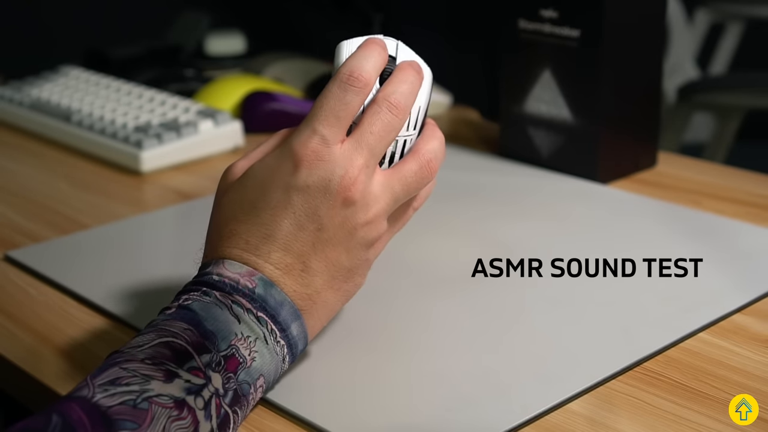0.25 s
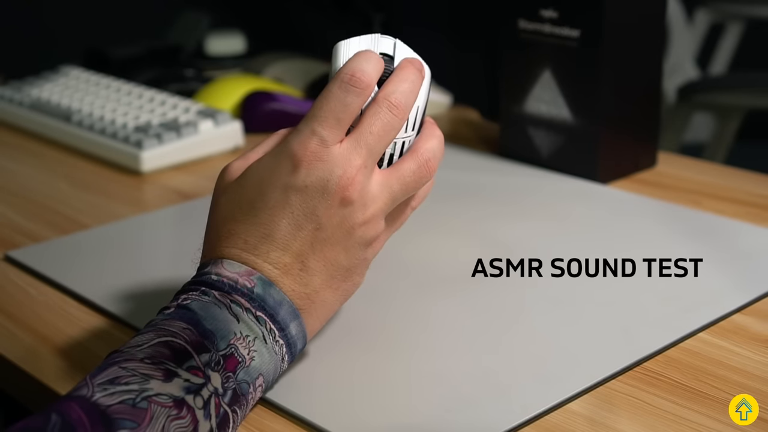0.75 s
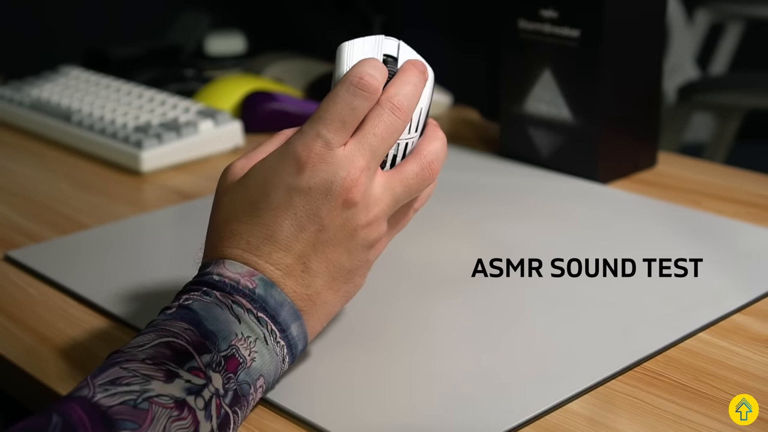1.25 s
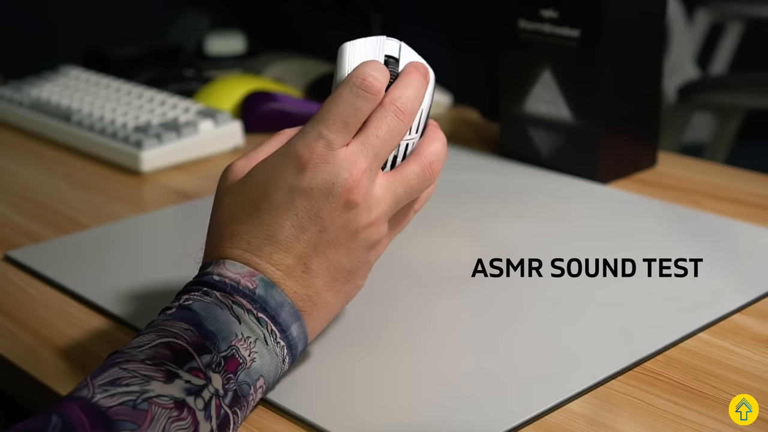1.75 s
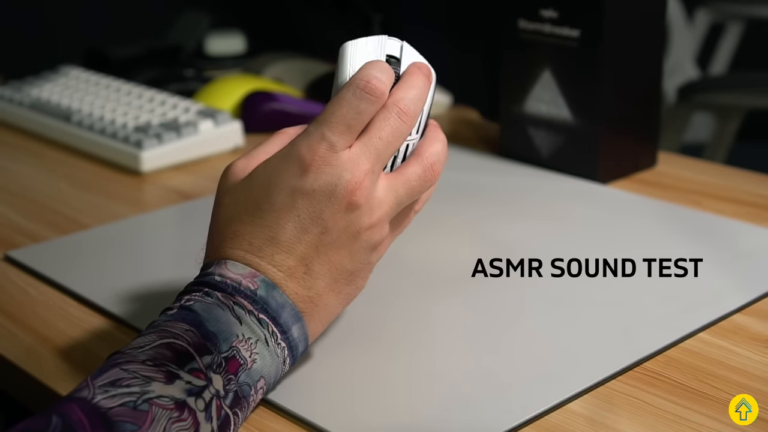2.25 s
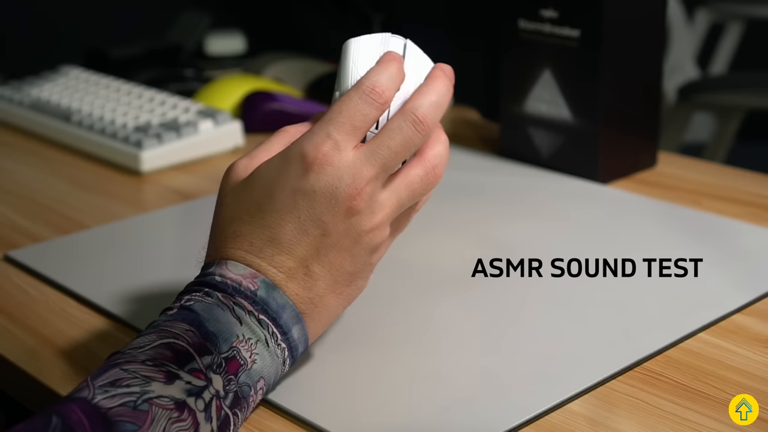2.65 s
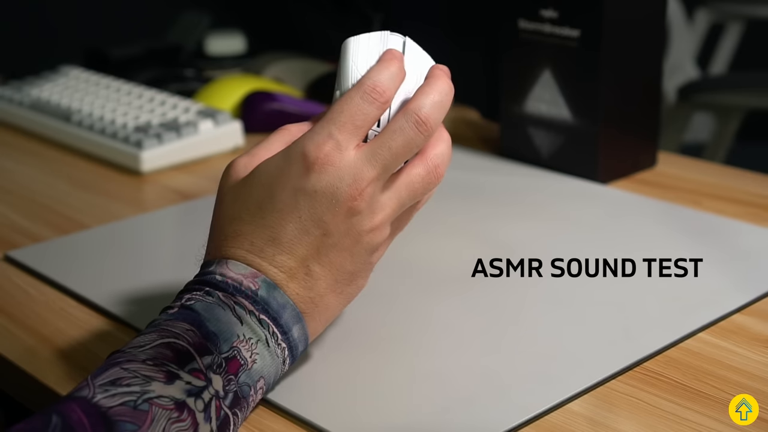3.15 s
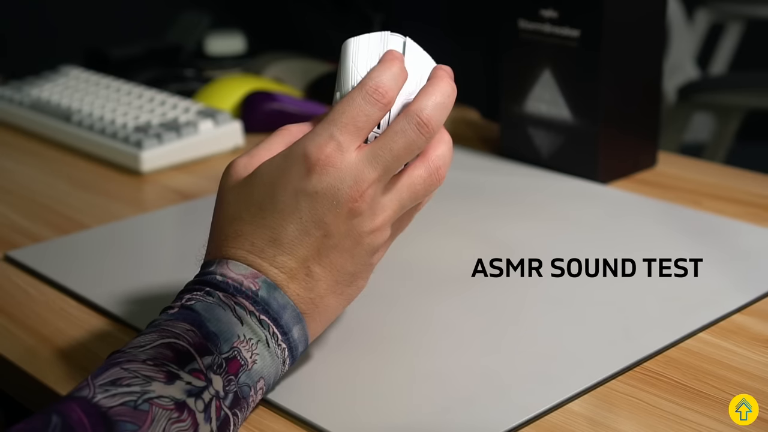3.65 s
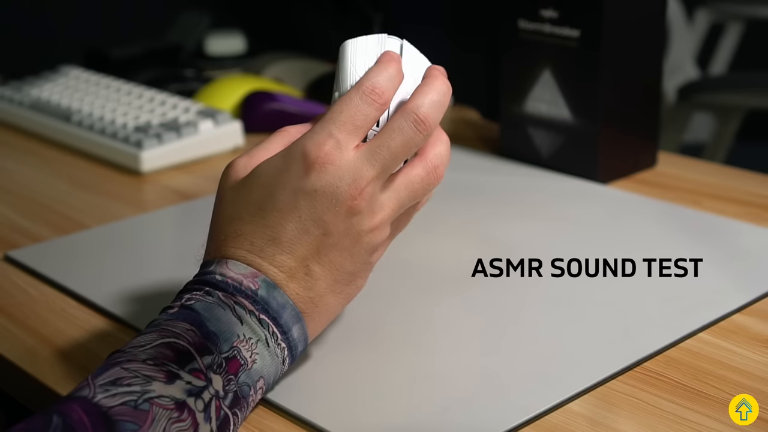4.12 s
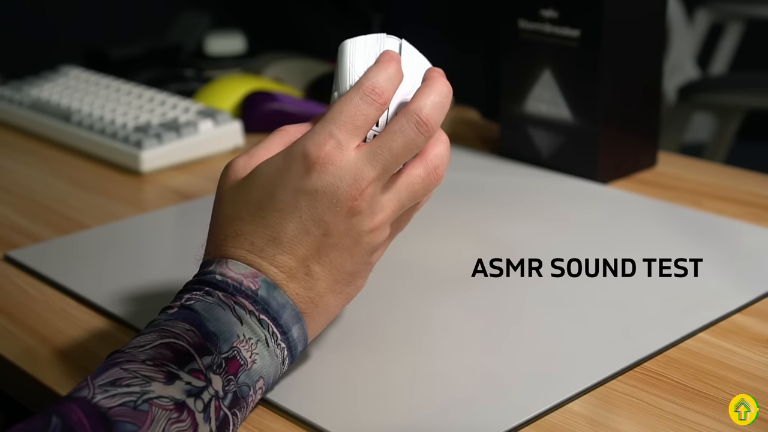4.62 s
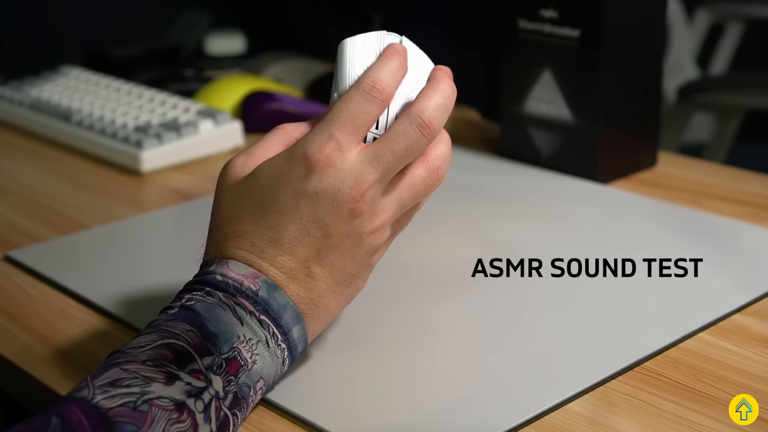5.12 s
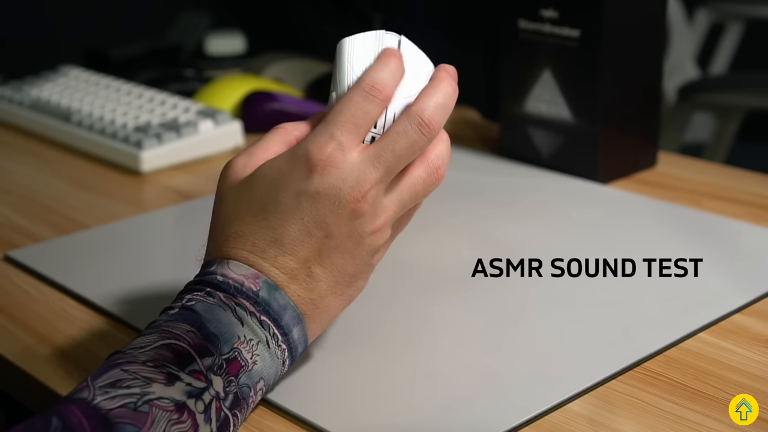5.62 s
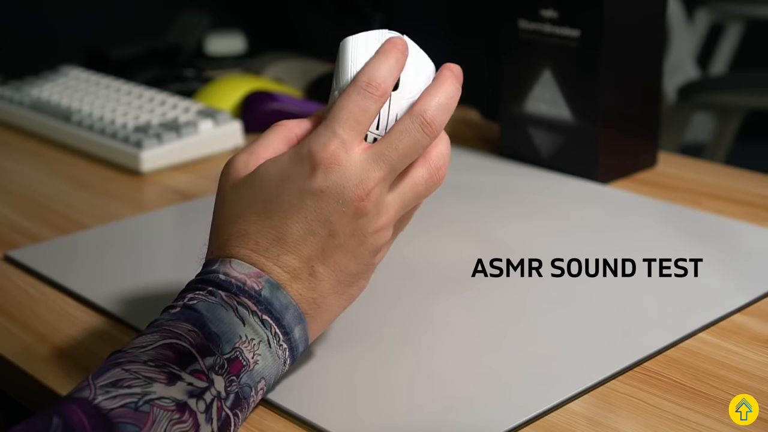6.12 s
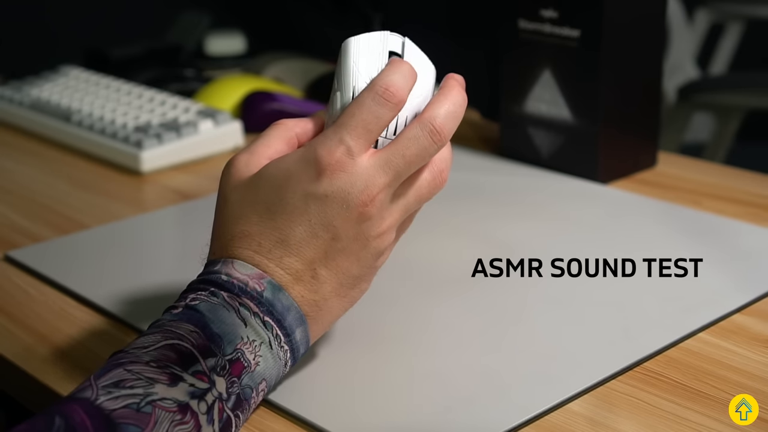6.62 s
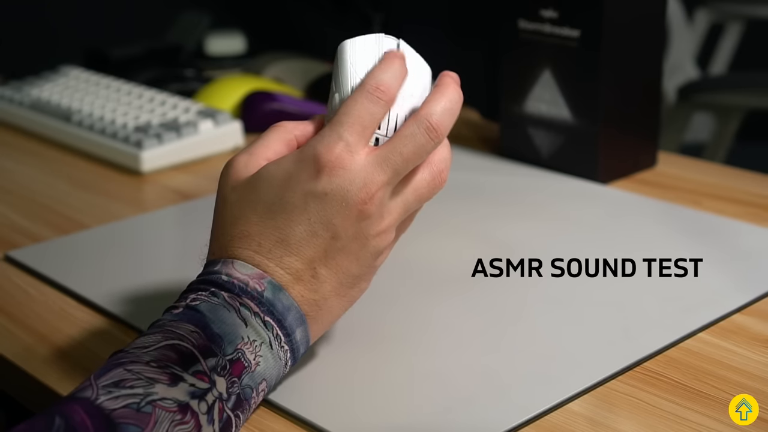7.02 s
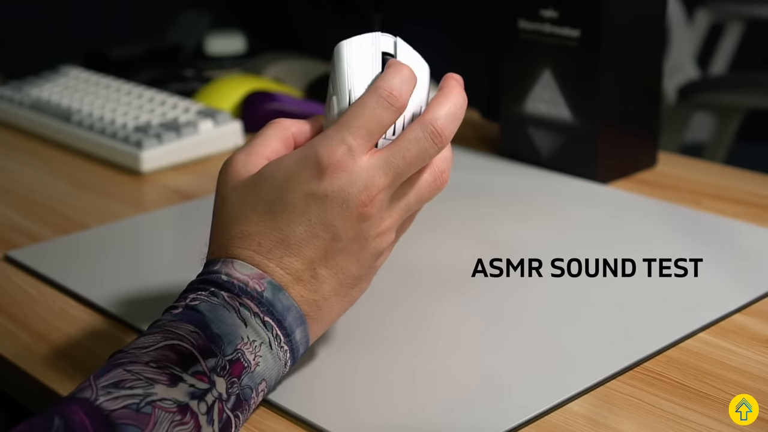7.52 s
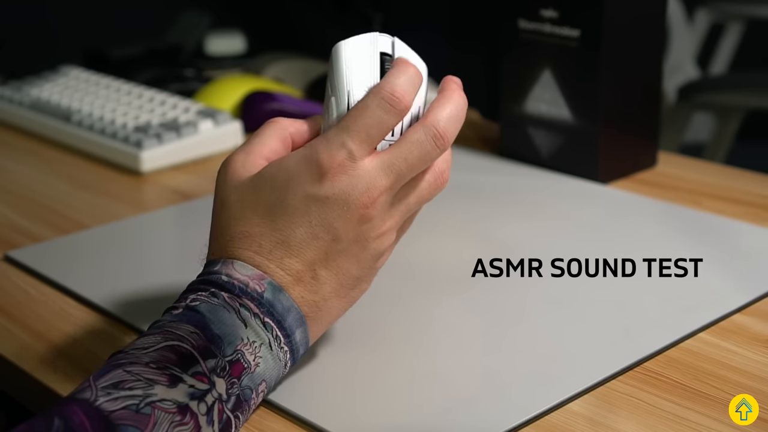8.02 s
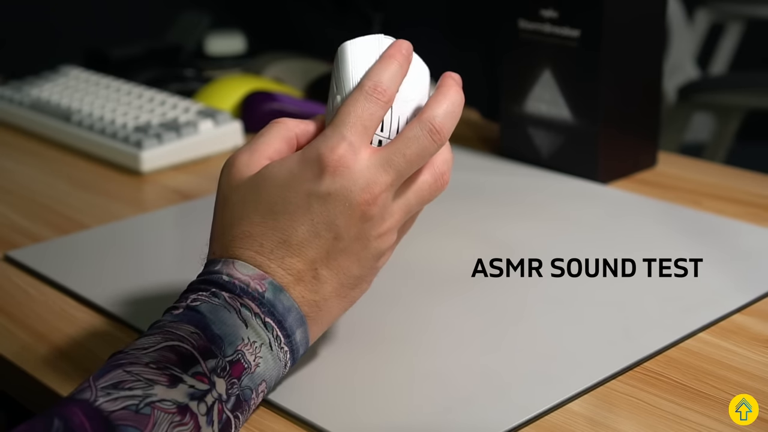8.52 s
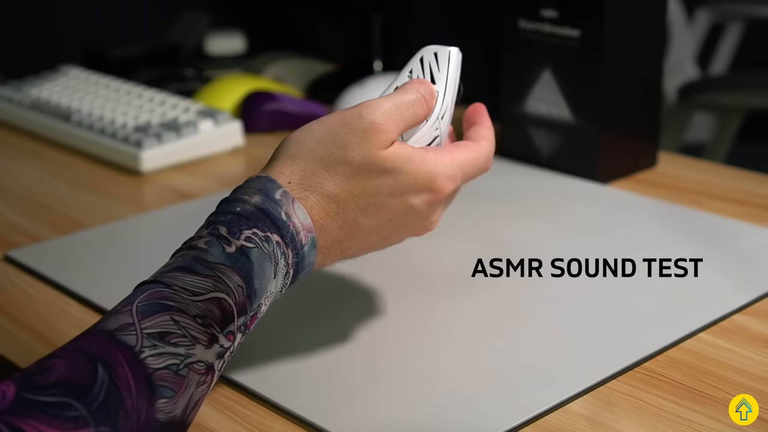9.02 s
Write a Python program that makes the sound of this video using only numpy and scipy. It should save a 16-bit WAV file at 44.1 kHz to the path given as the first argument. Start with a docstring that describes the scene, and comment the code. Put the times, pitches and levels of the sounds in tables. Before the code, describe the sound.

A small quiet room, microphone close to a computer mouse on a desk mat, with soft fan air and faint low hum throughout. From 0 to 2.4 s the main button clicks about four times a second, eleven crisp bright presses, with audible springing back between them; a couple of tiny squeaks hide early on. From 2.7 to 5 s the wheel is pressed seven times, slower and less regular, duller and hollower, with distinct down and up snaps; a low desk bump falls near 3.3 s. From 5.2 to 8.4 s the wheel rolls in twelve short flicks, each a tiny rapid ratchet of about five to eight ticks, quiet and muffled at first, crisper and stronger after 6.9 s. A faint hiss at 8.8 s precedes two sharp, loud, very bright side-button clicks at 8.9 and 9.1 s, each with a strong release. Short diffuse reflections follow the snaps.

```python
"""In a small quiet room, a computer mouse is tried out on a desk mat, close to the microphone. The main buttons
click, the wheel is pressed as a button, then rolled in short flicks; last, the side buttons click. Each snap is
a tiny impact with weak rebounds that rings the plastic parts; noise shaped like a room adds reflections. Under
it, low noise makes the desk sway and rumble, and a fan gives soft air noise and a hum."""
import sys
import numpy as np
from scipy import signal
from scipy.fft import rfft, irfft, next_fast_len
from scipy.io import wavfile
from scipy.ndimage import uniform_filter1d

SR = 44100
rng = np.random.default_rng(int(sys.argv[2]) if len(sys.argv) > 2 else 0)


def digitize_waveform(pressure):
    """Quantize a signal to 16-bit integers and store it at the path in sys.argv[1].

    Rows of a 2-D input are taken as channels; values are limited to [-1, 1].
    """
    field = np.atleast_2d(pressure).T
    bounded = np.clip(field, -1, 1)
    quanta = np.round(bounded * 32767).astype(np.int16)
    wavfile.write(sys.argv[1], SR, quanta)


N = 408366
TIME = np.arange(N) / SR   # s


def from_db(db):
    """Turns decibels into a plain factor."""
    return 10 ** (np.asarray(db) / 20)


def rms_one(x):
    """Scales a sound to an average strength (rms) of 1."""
    return x / np.sqrt(np.mean(x ** 2) + 1e-20)


def at_hz(points, hz, axis=1):
    """Reads one column of a table on a log-frequency axis."""
    table = np.array(points)
    return np.interp(np.log(hz + 1e-9), np.log(table[:, 0]), table[:, axis])


def noise(spectrum):
    """Steady noise of a given colour, with nothing above the table's highest frequency; rms 1."""
    size = next_fast_len(N)
    hz = np.fft.rfftfreq(size, 1 / SR)
    colour = from_db(at_hz(spectrum, hz)) * (hz < spectrum[-1][0])
    white = rng.standard_normal(N)
    return rms_one(irfft(rfft(white, size) * colour, size)[:N])


def resonate(x, hz, width):
    """A part that likes to ring at one pitch: gain 1 at the top, and a narrower width rings longer."""
    r = np.exp(-np.pi * width / SR)
    feed = np.array([1, 0, -1]) * (1 - r * r) / 2
    feedback = [1, -2 * r * np.cos(2 * np.pi * hz / SR), r * r]
    return signal.lfilter(feed, feedback, x)


def ring_together(x, modes):
    """Drives several modes at once with the same sound; every second mode is flipped in sign."""
    return sum((-1) ** k * from_db(db) * resonate(x, hz, width) for k, (hz, width, db) in enumerate(modes))


def disperse(x, transit_ms):
    """Bending waves run to and fro in the shell: allpasses smear a snap without colouring it."""
    for share in (.17, .31, .52):
        gap = np.zeros(max(int(share * transit_ms * SR / 1000), 1))
        x = signal.lfilter(np.r_[.6, gap, 1], np.r_[1, gap, .6], x)
    return x


# The finger never lies twice on the same spot, so every mode shifts a little from snap to snap.
DETUNE = 0.012   # typical shift, share of the pitch
RING_S = .03     # each ring is cut off after this time, before the smearing


def snaps(events, modes, transit_ms, chatter_db, chatter_s, scatter_db, crack_db, count=9):
    """Each snap is one impact and a few weak rebounds: a broad crack, and a short ring of every mode."""
    out, size = np.zeros(N + SR), int(RING_S * SR)
    parts = list(modes) + [(10200, 1800, crack_db)]   # the crack is one more, very wide mode
    for start, strength_db, brightness in events:
        delays = np.r_[0, rng.uniform(0, chatter_s, count - 1)]
        sizes = np.r_[1, rng.standard_normal(count - 1) * from_db(chatter_db)]
        sizes /= np.linalg.norm(sizes)   # the rebounds share the snap's energy
        impacts = np.bincount((delays * SR).astype(int), sizes, size)
        at = int(round(start * SR))
        for k, (hz, width, mode_db) in enumerate(parts):
            octaves = np.log2(hz / 6000)   # brightness tilts the modes around 6 kHz
            scatter = scatter_db * rng.standard_normal()
            height = from_db(strength_db + mode_db + brightness * octaves + scatter)
            pitch = hz * (1 + DETUNE * rng.standard_normal())
            out[at:at + size] += (-1) ** k * height * resonate(impacts, pitch, width)
    return disperse(out[:N] + 1e-18, transit_ms)


def blips(events):
    """Short tones that swell and fade."""
    total = 0
    for middle, hz, db, half in events:
        since = TIME - middle
        swell = np.exp(-(since / half) ** 2 / 2)
        total = total + from_db(db) * swell * np.sin(2 * np.pi * hz * since)
    return total


# Main button going down: (time [s], strength [dB], brightness [dB per octave])
MAIN_PRESSES = [(0.0338, 3, 3), (0.2903, 6, 0.3), (0.5578, 6, 0), (0.8466, 6, 0.4), (1.0669, 7, -0.3),
                (1.3283, 6, 0.2), (1.5714, 6, 0.2), (1.7758, 6, -0.3), (1.9853, 4.5, 0.5),
                (2.2051, 4.5, -0.5), (2.3785, 5, -0.5)]
# Main button springing back: (time [s], strength [dB], brightness [dB per octave])
MAIN_RELEASES = [(0.179, 3.6, 0.077), (0.4258, 5.3, -0.55), (0.723, 3.5, 0.61), (0.956, 5.4, -0.19),
                 (1.1953, 5.1, -0.46), (1.4192, 5.2, -0.23), (1.64, 5.7, 0.035), (1.8682, 5, -0.12),
                 (2.0824, 5, -0.035), (2.2708, 5.3, -0.38)]
# Ringing modes of the main button:
# (frequency [Hz], width [Hz], relative level on press [dB], relative level on release [dB])
BUTTON_MODES = [(693, 167, -26.5, -23.5), (1735, 296, -23, -27.5), (2785, 250, -24, -24.5),
                (3540, 390, -29, -22), (4670, 340, -8, -13), (5700, 243, -17, -14), (6840, 370, -8.5, -15),
                (7620, 370, -11, -11.5), (9030, 620, -12.5, -11), (9870, 590, -11, -8),
                (10600, 670, -3.5, -9.5), (11630, 520, 0, -10), (12720, 1470, -7, -12),
                (14170, 770, -7, -14), (15000, 590, -3, -11), (15570, 1120, -12.5, -38)]
# What rings besides when the finger lands near the lever's edge:
# (frequency [Hz], width [Hz], relative level [dB])
EDGE_MODES = [(1550, 230, -13), (3720, 260, -7), (4130, 120, -24.5), (6600, 130, 5)]


def main_buttons():
    """The switch leaf snaps down and springs back; on the first press the lever's edge rings as well."""
    hz, width, press_db, release_db = np.transpose(BUTTON_MODES)
    rebounds = dict(chatter_db=-17, chatter_s=.002, scatter_db=1.5)
    down = snaps(MAIN_PRESSES, list(zip(hz, width, press_db)), transit_ms=1.15, crack_db=-27, **rebounds)
    up = snaps(MAIN_RELEASES, list(zip(hz, width, release_db)), transit_ms=.95, crack_db=-35.5, **rebounds)
    edge = snaps(MAIN_PRESSES[:1], EDGE_MODES, transit_ms=0.93, crack_db=-27, **rebounds)
    return from_db(-0.63) * (down + edge) + up


# The wheel clicked as a button: (time down [s], time up [s], strength down [dB], strength up [dB],
# lead of the unsticking tick before the way up [s])
WHEEL_CLICKS = [(2.6888, 2.837, -6, -5, .0023), (2.965, 3.114, -6, -4.7, .0016),
                (3.218, 3.3564, -7, -5.5, .0115), (3.4653, 3.773, -7.5, -5, 0.0038),
                (4.0325, 4.193, -6.5, -6, 0.00101), (4.2832, 4.6646, -7, -4, .0005),
                (4.8037, 4.96, -7.5, -6.5, .002)]
DOWN_TILT, UP_TILT = -0.82, 0.75         # brightness going down and coming up, dB per octave
UNSTICK_DB, UNSTICK_TILT = -16, 8.7      # tick as it comes unstuck: strength dB, brightness dB per octave


def wheel_snaps():
    """A dull snap going down; coming up, a thin tick and then a brighter snap. Rows of (s, dB, brightness)."""
    rows = []
    for down, up, down_db, up_db, lead in WHEEL_CLICKS:
        rows.append((down, down_db, DOWN_TILT))
        rows.append((up - lead, UNSTICK_DB, UNSTICK_TILT))
        rows.append((up, up_db, UP_TILT))
    return rows


# Ringing modes of the wheel's cradle: (frequency [Hz], width [Hz], relative level [dB])
CRADLE_MODES = [(620, 210, -15.5), (1290, 150, -13.5), (1800, 160, -2), (2754, 225, 1), (2890, 200, 1),
                (3580, 380, -9.5), (4730, 270, -8.5), (5720, 270, -12), (6750, 650, -16.5),
                (7700, 990, -21), (9200, 650, -7), (9520, 1030, -10), (11120, 590, -14),
                (12400, 630, -20.5), (15070, 690, -21)]


def wheel_button():
    """Pressing the wheel knocks its whole cradle: a duller, longer click."""
    contact = dict(transit_ms=1.5, chatter_db=-18, chatter_s=.003, scatter_db=1.2, crack_db=-34)
    return from_db(-0.13) * snaps(wheel_snaps(), CRADLE_MODES, **contact)


# Flicks of the finger on the wheel: one notch as it takes hold, a quick run, one late notch as it settles.
# (first notch [s], run begins [s], run ends [s], last notch [s], notches in the run [count],
#  slowing of the run [0-1], strength of the first notch [dB], of the run's middle [dB],
#  of the last notch [dB], brightness [dB per octave])
FLICKS = [(5.2575, 5.2774, 5.3066, 5.3372, 3, .2, -20.5, -25, -27, -1.5),
          (5.569, 5.581, 5.6141, 5.6384, 4, 0.12, -31, -21, -25.5, -2.5),
          (5.853, 5.87, 5.8935, 5.9078, 3, 0.02, -23.5, -22.7, -22, -3.2),
          (6.153, 6.1646, 6.1807, 6.188, 3, 0.02, -25, -17.5, -24.5, -1.6),
          (6.394, 6.428, 6.4666, 6.4782, 4, .05, -28.5, -21, -23, -3),
          (6.7264, 6.744, 6.7674, 6.781, 3, 0, -29, -24, -20.5, -3),
          (6.9484, 6.9586, 7.009, 7.0445, 6, 0.29, -16.5, -13.5, -19, 1.2),
          (7.2085, 7.242, 7.2936, 7.325, 5, 0.18, -19.5, -15, -28, 1.5),
          (7.478, 7.517, 7.5549, 7.5773, 4, 0, -14.5, -15, -21.5, 0.5),
          (7.747, 7.784, 7.8175, 7.8346, 4, 0.01, -18, -13.5, -19, 0.5),
          (8.0214, 8.0534, 8.0931, 8.116, 4, 0.02, -20.5, -17, -20, 0.5),
          (8.303, 8.3381, 8.376, 8.3937, 4, 0.01, -19.5, -16, -23, 1.8)]
RUN_EDGE_DB = -2.5   # the ends of a run are weaker than its middle
SLOW_TILT = -0.6     # the first and last notches are slow and so duller, dB per octave


def notches():
    """A run is strongest in the middle, and its notches may spread out later on. Rows of (s, dB, brightness)."""
    rows = []
    for first, begin, end, last, count, slowing, first_db, run_db, last_db, tilt in FLICKS:
        turned = np.linspace(0, 1, int(round(count)))
        times = begin + (end - begin) * turned * (1 - slowing * (1 - turned))
        strengths = run_db + RUN_EDGE_DB * (2 * turned - 1) ** 2
        rows += [(s, db, tilt) for s, db in zip(times, strengths)]
        rows += [(first, first_db, tilt + SLOW_TILT), (last, last_db, tilt + SLOW_TILT)]
    return rows


SLACK_S = .005                     # the slack knocks this long before the first notch
SLACK_DB, SLACK_TILT = -7, -3.5    # strength against that notch dB, brightness dB per octave


def slack_knocks():
    """The finger first pushes the axle across its play. Rows of (s, dB, brightness)."""
    rows = []
    for first, *_, first_db, run_db, last_db, tilt in FLICKS:
        rows.append((first - SLACK_S, first_db + SLACK_DB, SLACK_TILT))
    return rows


# The axle rubbing in its cradle: (frequency [Hz], width [Hz], relative level [dB])
AXLE_MODES = [(605, 64, 3), (1180, 100, -1), (1530, 220, 0), (1830, 160, 5), (3600, 1000, -3.5),
              (6230, 1200, -7)]


def axle_rub(level_db=-60, smear_s=0.0035):
    """The faster the notches pass, the louder the turning axle rubs: uneven noise through its modes."""
    speed = sum(np.exp(-((TIME - s) / smear_s) ** 2 / 2) for s, db, brightness in notches())
    grit = rng.standard_normal(N) * from_db(3.6 * rng.standard_normal(N))
    return from_db(level_db) * np.sqrt(speed) * ring_together(grit, AXLE_MODES)


# The wheel nudged by the resting finger: (time [s], strength [dB], brightness [dB per octave])
NUDGES = [(3.583, -27, 4), (4.7552, -26, -1.5), (5.1946, -20.5, -0.5)]
# Ringing modes of the wheel and its spring: (frequency [Hz], width [Hz], relative level [dB])
WHEEL_MODES = [(580, 200, -7.5), (1210, 190, -10), (1560, 480, -7), (1970, 400, -8), (2610, 370, -11.5),
               (3760, 690, -10), (4650, 740, -11), (5840, 400, -4), (6800, 440, -2.5), (7650, 1030, -7),
               (9110, 760, -5), (10050, 640, -4), (11970, 1430, -3), (12450, 670, 0), (14750, 1690, -16),
               (15700, 800, -16)]


def scrolling():
    """One small tick for each notch that passes the spring, with slack knocks, nudges and the axle's rub."""
    contact = dict(transit_ms=.75, chatter_db=-15, chatter_s=.0025, scatter_db=1.5, crack_db=-22)
    ticks = snaps(notches() + slack_knocks() + NUDGES, WHEEL_MODES, **contact)
    return from_db(-2.5) * ticks + axle_rub()


# Side buttons going down: (time [s], strength [dB], brightness [dB per octave])
SIDE_PRESSES = [(8.9141, 7.9, 0.5), (9.1425, 7.5, 0.4)]
# Side buttons springing back: (time [s], strength [dB], brightness [dB per octave])
SIDE_RELEASES = [(9.0304, 9.3, 0.66), (9.2512, 9.3, 0.4)]
# Ringing modes of the side buttons:
# (frequency [Hz], width [Hz], relative level on press [dB], relative level on release [dB])
SIDE_MODES = [(1130, 360, -17.5, -21.5), (2070, 510, -35, -29), (2550, 240, -36, -38), (4240, 300, -14, -9),
              (4680, 340, -20.5, -15), (6160, 400, -3, 1), (6310, 510, -8, -5), (7450, 700, -29, -26),
              (9750, 550, -6, -9.5), (10150, 580, -7, -9), (11400, 620, -3.5, -6), (11970, 650, -6, -7),
              (13700, 730, -11, -11), (15100, 800, 0.5, -1), (15900, 1830, -4.5, -3.5)]


def side_buttons():
    """Small stiff levers give sharp clicks, with one balance of modes going down and another coming back."""
    hz, width, press_db, release_db = np.transpose(SIDE_MODES)
    contact = dict(transit_ms=.8, chatter_db=-16, chatter_s=.0012, scatter_db=1.5, crack_db=-26)
    down = snaps(SIDE_PRESSES, list(zip(hz, width, press_db)), **contact)
    up = snaps(SIDE_RELEASES, list(zip(hz, width, release_db)), **contact)
    return from_db(-0.2) * (down + up)


def soft_hiss(start_s=8.83, level_db=-65, fade_s=.05):
    """A brief faint hiss with the colour of the side buttons: it starts at once and dies away."""
    grain = rng.standard_normal(N)
    press_modes = [(hz, width, press_db) for hz, width, press_db, _ in SIDE_MODES]
    hiss = rms_one(ring_together(grain, press_modes))
    fade = (TIME > start_s) * np.exp(-np.abs(TIME - start_s) / fade_s)
    return from_db(level_db) * hiss * fade


# Tiny squeaks: (time [s], pitch [Hz], level [dB], half length [s])
SQUEAKS = [(.411, 2600, -57.5, 0.004), (.632, 2560, -62, 0.0057)]


def squeaks():
    """Tiny high tones that swell and fade within a few milliseconds."""
    return blips(SQUEAKS)


# Broad sound of the shell's flat faces, thrown sideways into the room:
# (frequency [Hz], width [Hz], relative level [dB])
SHELL_MODES = [(1680, 1300, -27), (4230, 1200, -19), (6790, 2200, -16.5), (12800, 4000, -13.5)]
# The same for a press on the wheel: (frequency [Hz], width [Hz], relative level [dB])
HOLLOW_MODES = [(1680, 880, -15.5), (3530, 1900, -13.5), (7960, 4000, -20.5)]


def shell_spray():
    """The shell's faces send button snaps past the microphone, so the room answers more broadly than the click."""
    contact = dict(transit_ms=1.0, chatter_db=-18, chatter_s=.002, scatter_db=1.0, crack_db=-30)
    button_snaps = np.vstack([MAIN_PRESSES, MAIN_RELEASES, SIDE_PRESSES, SIDE_RELEASES])
    bright = snaps(button_snaps, SHELL_MODES, **contact)
    dull = snaps(wheel_snaps(), HOLLOW_MODES, **contact)
    return from_db(-3.0) * bright + from_db(-0.5) * dull


def even_out(response, ripple_hz=100, colour_hz=800):
    """A diffuse room favours no single pitch: narrow peaks and dips are levelled, the broad colour stays."""
    spectrum = rfft(response, SR)
    power = np.abs(spectrum) ** 2
    ripple = uniform_filter1d(power, ripple_hz) + 1e-9
    colour = uniform_filter1d(power, colour_hz) + 1e-9
    return irfft(spectrum * np.sqrt(colour / ripple), SR)[:len(response)]


# The room's echo: (frequency [Hz], time to fade by 60 dB, early swell aside [s], relative level [dB])
ROOM = [(500, 0.75, -6), (1830, 0.085, -6.5), (4500, 0.31, -10.5), (7000, 0.15, -7), (11000, 0.22, -10.5),
        (16000, 0.25, -19.5)]


def room(x, first_s=0.00063, build_s=0.0006, early_db=11.0, early_s=0.012):
    """Dense reflections: first from the desk and things on it, then from the walls, dying band by band."""
    t = np.arange(SR // 2) / SR
    onset = 1 - np.exp(-np.maximum(t - first_s, 0) / build_s)
    swell = onset * from_db(early_db * np.exp(-t / early_s))
    edges, response = np.geomspace(300, 18000, 11), 0   # band edges, Hz
    for low, high in zip(edges, edges[1:]):
        hz = np.sqrt(low * high)
        fade = swell * from_db(-60 * t / at_hz(ROOM, hz))
        band_filter = signal.butter(2, [low, high], "band", fs=SR, output="sos")
        band = signal.sosfilt(band_filter, rng.standard_normal(len(t)))
        level = from_db(at_hz(ROOM, hz, axis=2))
        response = response + band * fade / np.linalg.norm(fade) * level
    return signal.fftconvolve(x, even_out(response))[:N]


# Colour of the sway: (frequency [Hz], relative level per Hz [dB])
SWAY = [(10, -30), (22, -13), (28, -3), (31, 0), (35, -6), (42, -14), (60, -40)]
# Slow sway of the desk, before its trim: (time [s], level [dB])
SWAY_LEVEL = [(0.0, -57), (0.31, -50), (0.36, -59), (0.62, -52), (0.67, -67.5), (1.8, -54), (2.99, -57),
              (3.38, -47.5), (3.66, -61), (4.74, -54.5), (4.82, -67), (5.26, -42.5), (5.7, -52.5),
              (8.38, -53), (8.46, -60), (8.79, -49), (8.9, -66.5), (9.26, -65)]
# Colour of the rumble: (frequency [Hz], relative level per Hz [dB])
RUMBLE = [(30, -36.5), (44, 1), (53, 4), (58, 8), (65, 1.5), (78, 1), (92, -14), (130, -45)]
# Rumble of the desk, before its trim: (time [s], level [dB])
RUMBLE_LEVEL = [(0.0, -62), (0.02, -58), (1.49, -59), (1.52, -63.5), (3.22, -68), (3.33, -42), (3.63, -68),
                (3.84, -59), (3.94, -65), (5.13, -56), (7.92, -56.5), (8.43, -52), (8.51, -63), (9.26, -65)]
# Soft bumps on the desk: (time [s], pitch [Hz], level [dB], half length [s])
BUMPS = [(3.325, 61.3, -42.5, 0.037), (3.41, 56, -57, 0.045)]


def desk(sway_trim_db=0.5, rumble_trim_db=-1.5):
    """The desk sways and rumbles: two low noises that rise and fall, plus soft bumps."""
    sway_db = np.interp(TIME, *np.transpose(SWAY_LEVEL)) + sway_trim_db
    sway = from_db(sway_db) * noise(SWAY)
    rumble_db = np.interp(TIME, *np.transpose(RUMBLE_LEVEL)) + rumble_trim_db
    rumble = from_db(rumble_db) * noise(RUMBLE)
    return sway + rumble + blips(BUMPS)


# Fan and mains tones: (frequency [Hz], rms level [dB])
HUM = [(58, -63), (120, -67), (138, -71.5), (205, -74), (386, -75), (662, -90), (772, -83)]
# Colour of the room's air noise: (frequency [Hz], relative level per Hz [dB])
AIR = [(60, -13), (100, -5.5), (138, 3.5), (175, -5), (220, 1), (330, -4), (450, -9), (650, -8.5),
       (850, -14), (1100, -19), (2300, -25), (5000, -30.5), (11000, -30), (16000, -33)]


def fan(air_db=-65.0, waver=0.29):
    """Moving air with a few tones whose phase wavers slightly (waver in radians)."""
    hum = 0
    for hz, db in HUM:
        wander = np.interp(TIME, np.linspace(0, TIME[-1], 40), rng.standard_normal(40))
        phase = 2 * np.pi * (hz * TIME + rng.random()) + waver * wander
        hum = hum + np.sqrt(2) * from_db(db) * np.sin(phase)   # root 2 turns rms into peak
    return hum + from_db(air_db) * noise(AIR)


def scene():
    """Each part of the mouse sends its own share into the room."""
    main, middle, wheel, side = main_buttons(), wheel_button(), scrolling(), side_buttons()
    into_room = from_db(-2.0) * main + from_db(-3.0) * middle + from_db(2.5) * wheel + from_db(-4) * side
    reflections = room(into_room) + room(shell_spray())
    mouse = main + middle + wheel + side + squeaks() + soft_hiss()
    return (mouse + reflections + desk() + fan())[None]


CUTOFF_HZ = 16200


def record(dry):
    """The top is cut steeply."""
    steep = signal.ellip(10, .1, 80, CUTOFF_HZ, fs=SR, output="sos")   # 0.1 dB ripple, 80 dB down
    return signal.sosfilt(steep, dry)


dry = scene()
out = record(dry)
digitize_waveform(out)
```